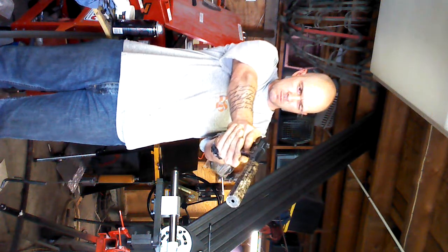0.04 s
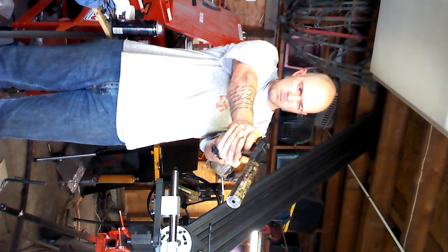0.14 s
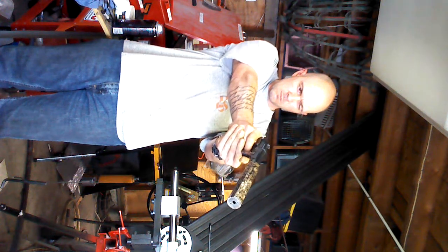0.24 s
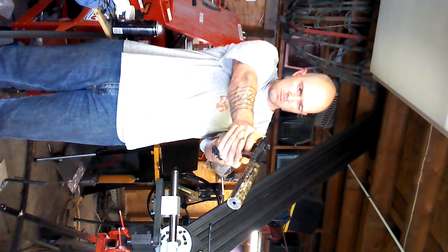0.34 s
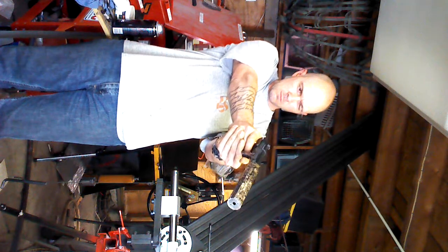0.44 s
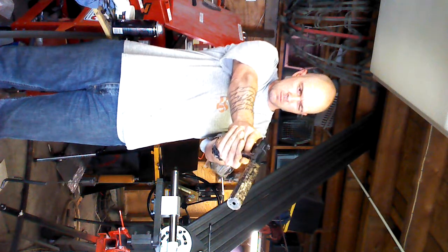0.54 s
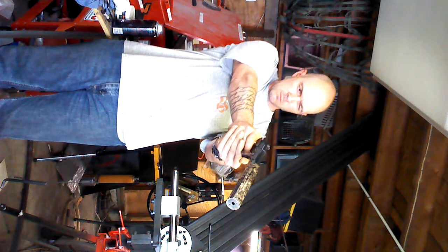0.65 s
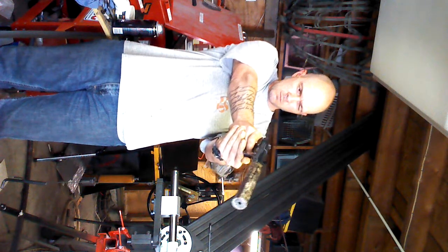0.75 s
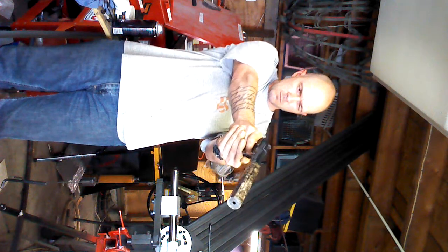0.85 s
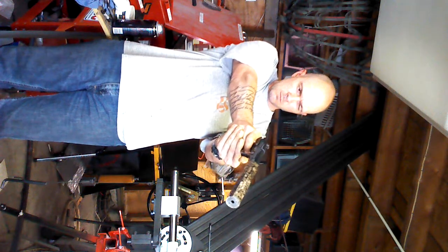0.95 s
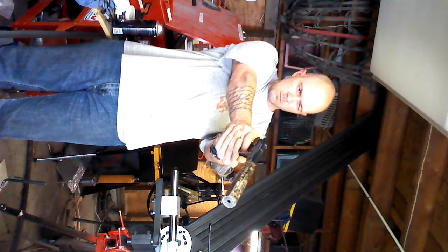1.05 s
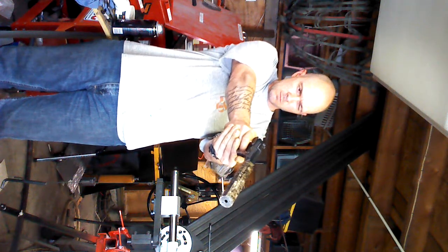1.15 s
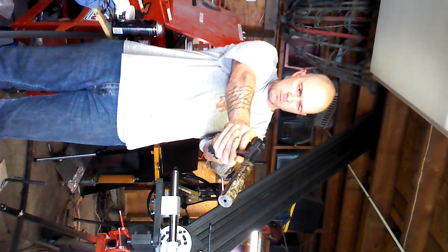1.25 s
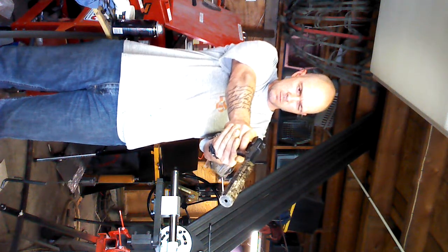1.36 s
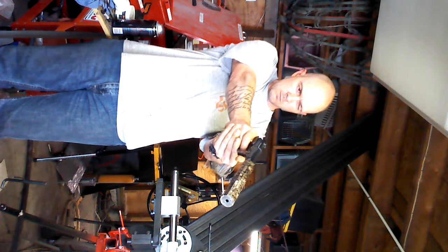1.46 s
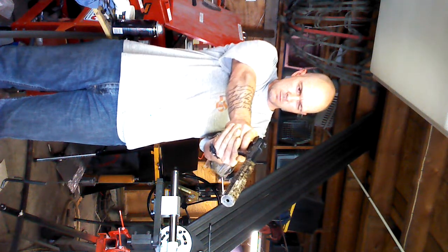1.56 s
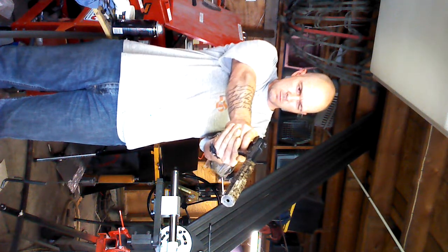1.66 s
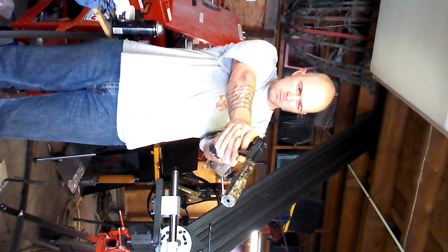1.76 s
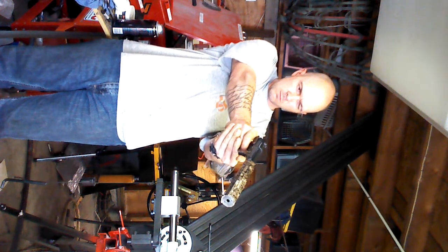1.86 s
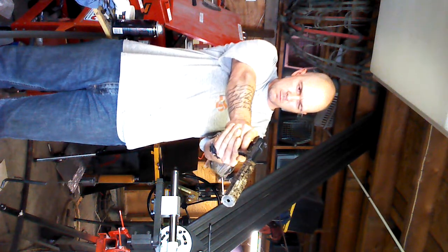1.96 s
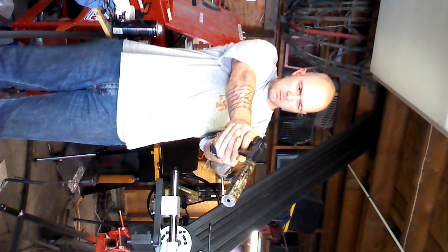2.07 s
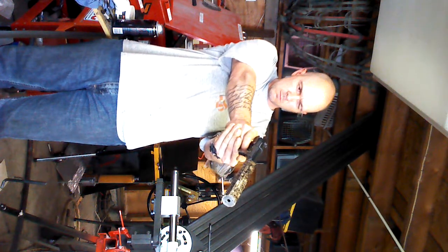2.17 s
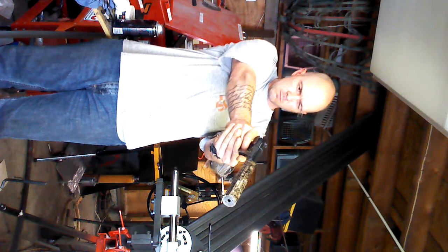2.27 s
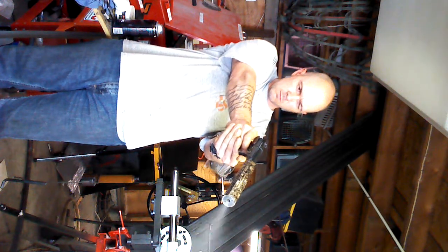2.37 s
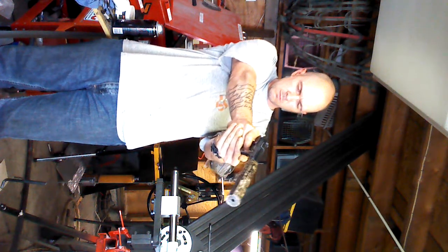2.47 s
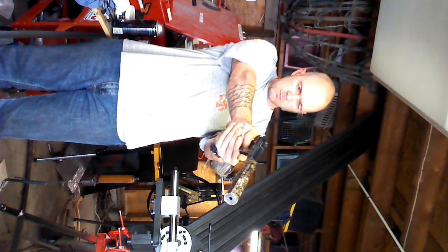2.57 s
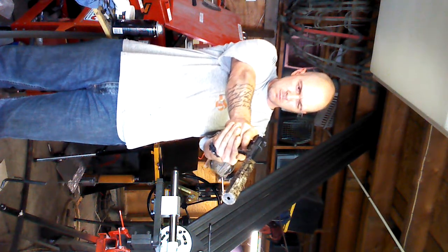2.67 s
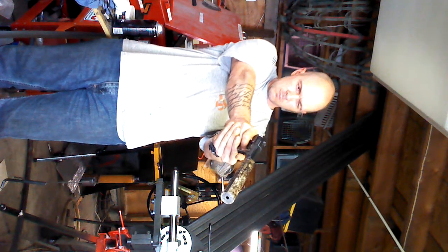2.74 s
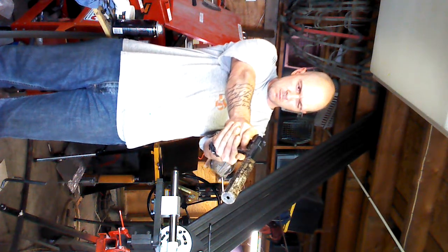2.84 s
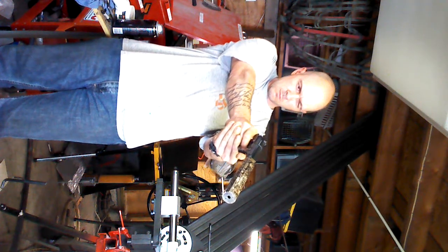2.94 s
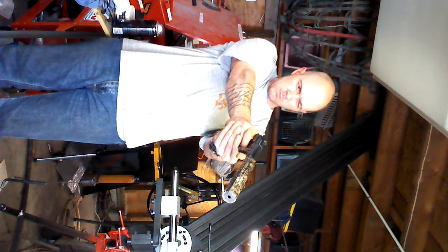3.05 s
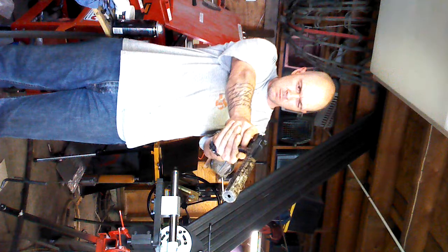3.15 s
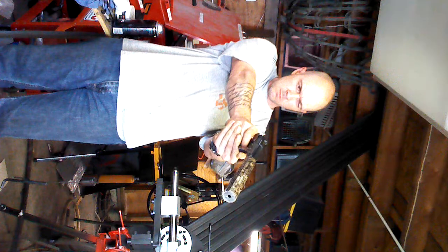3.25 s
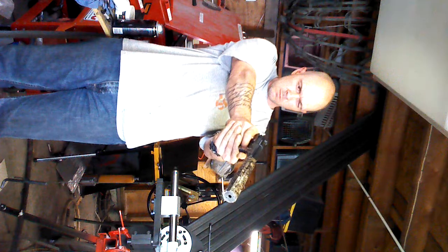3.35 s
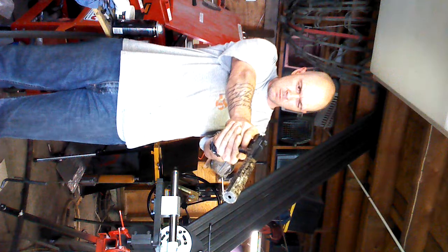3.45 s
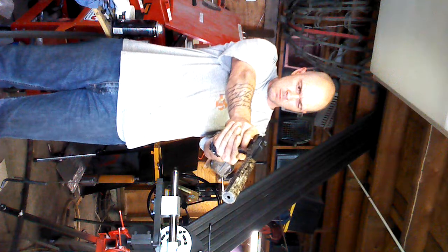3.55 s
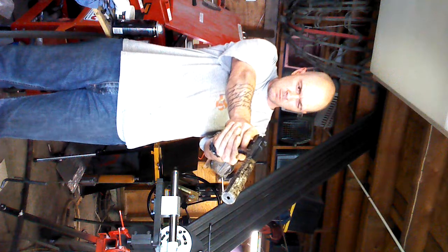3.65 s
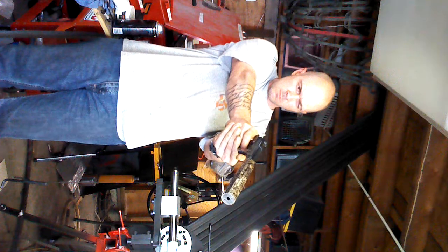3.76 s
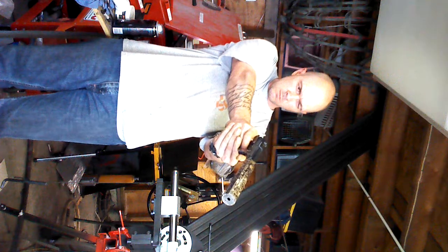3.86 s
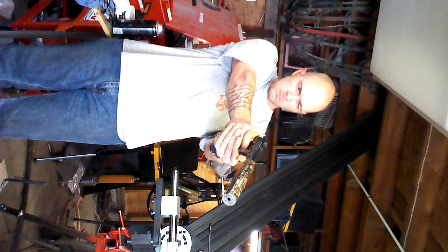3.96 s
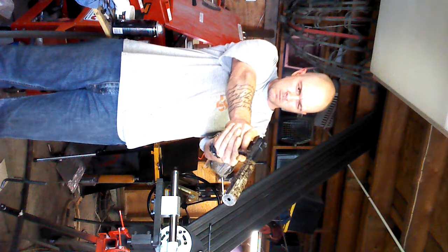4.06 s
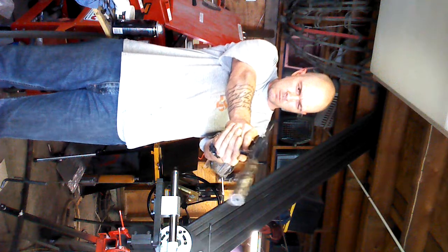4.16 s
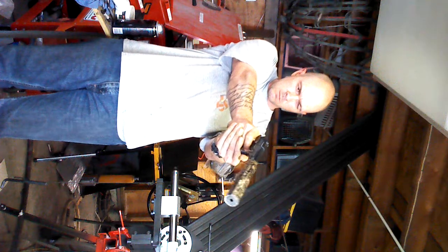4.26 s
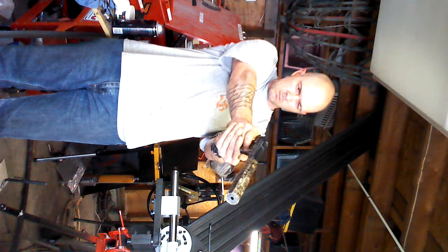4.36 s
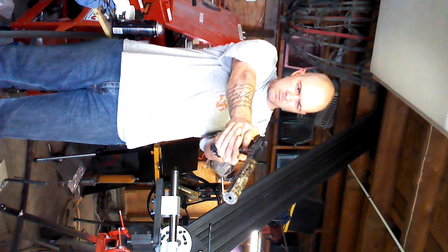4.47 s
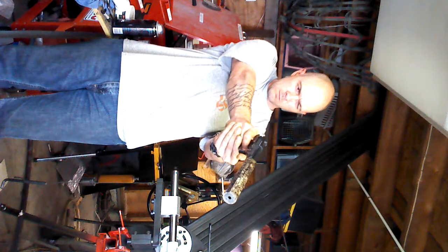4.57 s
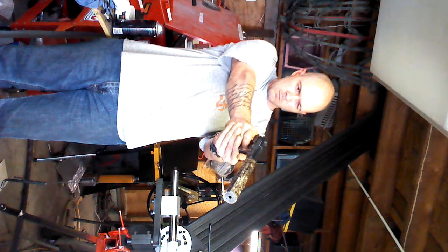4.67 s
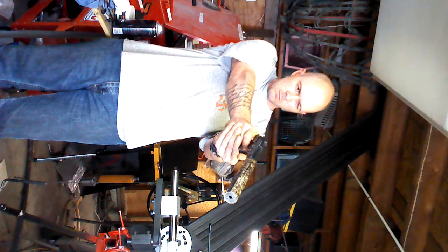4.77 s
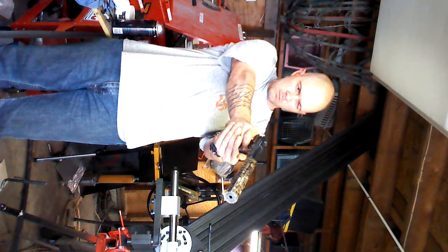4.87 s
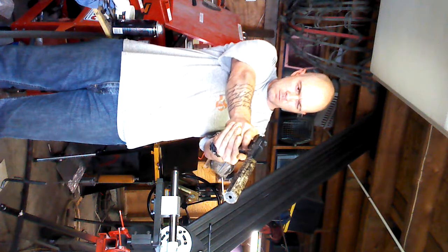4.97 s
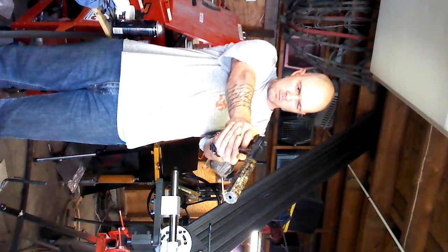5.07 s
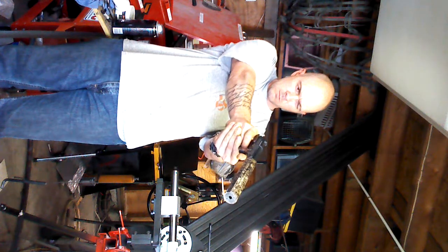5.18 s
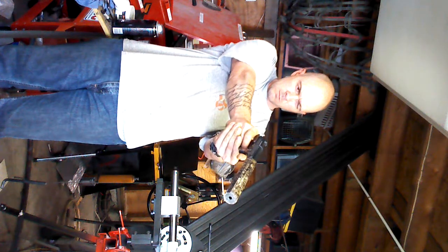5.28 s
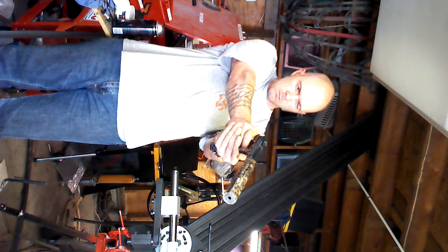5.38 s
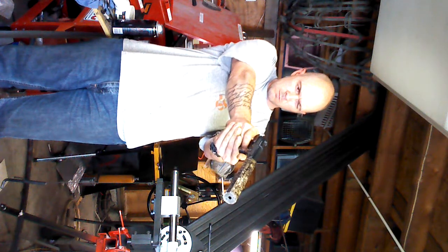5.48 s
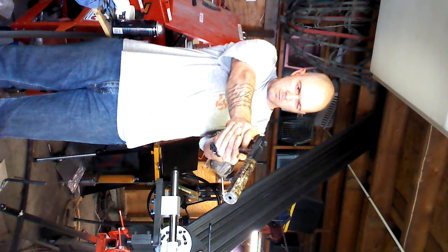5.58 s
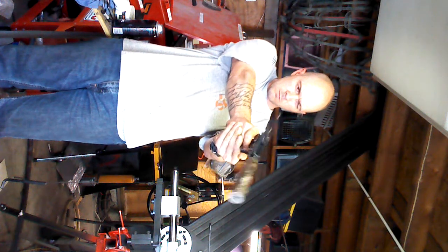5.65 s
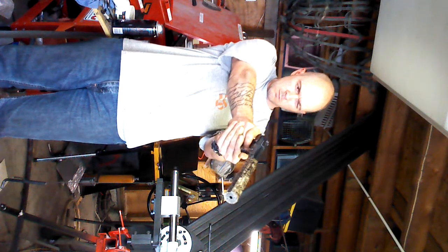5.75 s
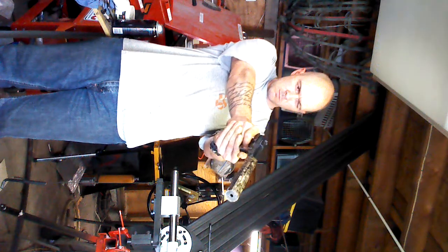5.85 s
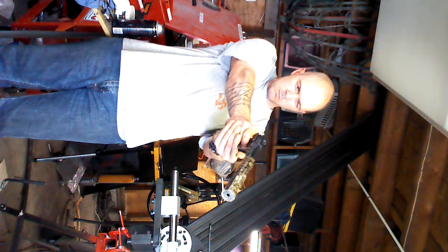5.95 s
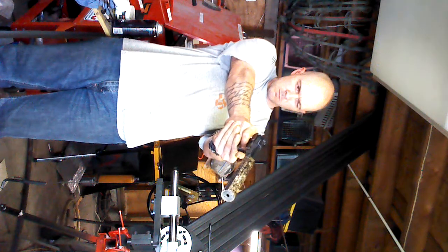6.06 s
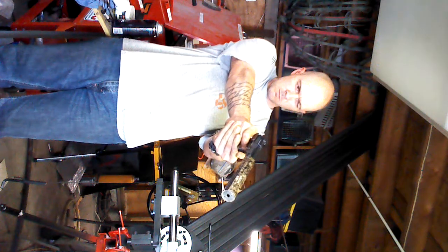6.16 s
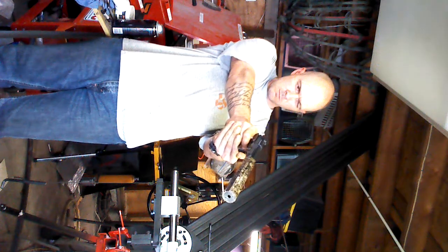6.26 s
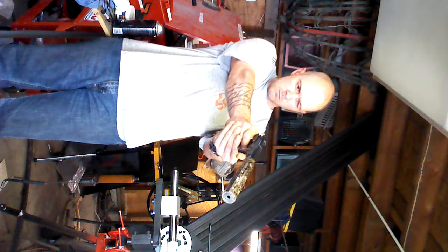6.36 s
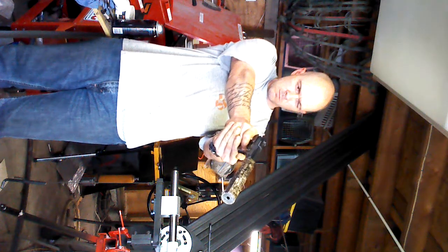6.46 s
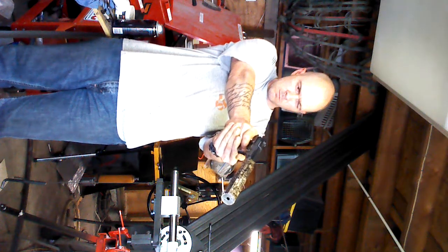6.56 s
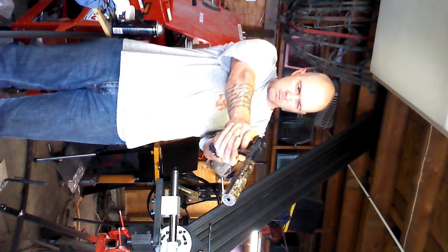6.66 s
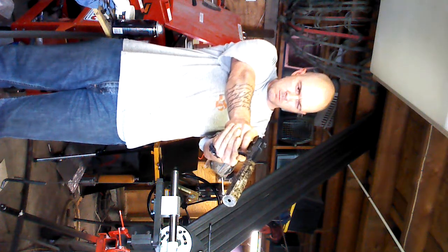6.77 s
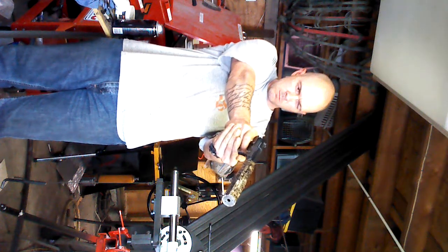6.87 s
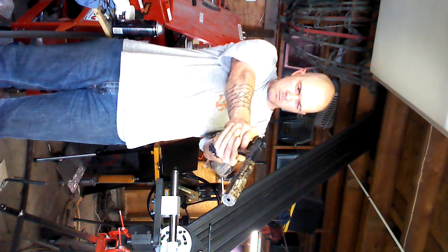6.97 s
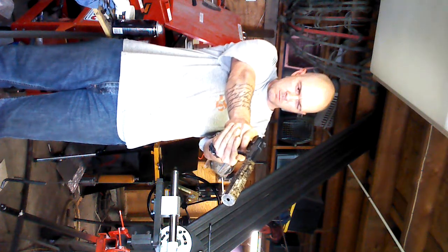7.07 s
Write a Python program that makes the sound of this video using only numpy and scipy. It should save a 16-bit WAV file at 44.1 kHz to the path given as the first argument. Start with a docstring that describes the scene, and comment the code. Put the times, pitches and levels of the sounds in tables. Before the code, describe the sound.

A quiet small-calibre pistol fires four spaced, snapping pops into wood, with slide rattle, trigger clicks and bouncing cases above a droning fan.

```python
"""A workshop with a droning fan, where a suppressed small-calibre pistol fires four times.
Shots sum a hammer, a muzzle pop ringing the suppressor's air, gas noise, a slide rattle and a strike on a
wooden block. Brass cases bounce on floor and benches, a steel tube rings and the trigger clicks: noise and modes.
The recorder cuts its gain on loud sound, lets it creep back, and subtracts from each microphone the other, delayed."""
import sys
import numpy as np
from scipy import signal
from scipy.fft import rfft, irfft, next_fast_len
from scipy.io import wavfile
from scipy.ndimage import uniform_filter1d

SR = 44100
rng = np.random.default_rng(int(sys.argv[2]) if len(sys.argv) > 2 else 0)


def transcribe(u):
    """Save the signal u as a 16-bit wav file named by the first command-line argument.

    u: samples, shape (n,) or (channels, n), limited to [-1, 1]; the rate is SR.
    q: integer samples, one column per channel.
    """
    v = np.clip(np.atleast_2d(u).T, -1, 1)
    q = np.round(v * 32767).astype(np.int16)
    wavfile.write(sys.argv[1], SR, q)


N = 313992


def amp(db):
    """Amplitude factor of a level in dB."""
    return 10 ** (np.asarray(db) / 20)


def unit(x):
    """Scale to rms 1."""
    return x / np.sqrt(np.mean(x ** 2) + 1e-20)


def along(points, hz):
    """Interpolate (Hz, value) points on a log frequency axis."""
    f, v = np.transpose(points)
    return np.interp(np.log(hz + 1), np.log(f + 1), v)


def filtered(x, response):
    """Multiply the spectrum of x by response(hz)."""
    size = next_fast_len(x.shape[-1] + 4096)
    spectrum = rfft(x, size) * response(np.fft.rfftfreq(size, 1 / SR))
    return irfft(spectrum, size)[..., :x.shape[-1]]


def add(track, start_s, sound):
    """Mix a two-microphone sound into track at start_s."""
    part = track[:, round(start_s * SR):][:, :sound.shape[1]]
    part += sound[:, :part.shape[1]]


# Likeness of diffuse noise at the two microphones. Each row: frequency in Hz, correlation from 0 to 1.
FAR_LIKENESS = [(300, 1), (520, 0.5), (700, 0.19), (1000, 0.026), (16000, 0.0072)]


def diffuse(colour, size, likeness=FAR_LIKENESS):
    """Noise of rms 1 from many directions: the microphones' correlation depends on frequency."""
    def shape(hz):
        angle = np.arccos(np.clip(along(likeness, hz), 0, 1)) / 2
        return amp(along(colour, hz)) * [np.cos(angle), np.sin(angle)]

    mid, side = filtered(rng.standard_normal((2, size)), shape)
    return unit(np.array([mid + side, mid - side]))


# Fan noise spectrum. Each row: frequency in Hz, relative level in dB.
FAN_NOISE = [(20, -24.5), (60, -26), (86, -6.5), (110, -2.5), (170, -6), (260, -5), (350, -2.5),
             (520, -6.5), (700, -10.5), (950, -17), (1300, -14), (1750, -20.5), (2400, -29), (3500, -34),
             (5000, -40.5), (8000, -49.5), (16000, -64)]
# Unsteady fan tones. Each row: frequency in Hz, half-width in Hz, level in dB.
FAN_TONES = [(206.1, 2.6, -50.5), (249, 23, -50.5), (324.8, 6, -52.5), (362, 15, -55.5), (457.2, 12, -52.5),
             (548, 11, -61)]


def fan():
    """Air noise, plus a steady tone and narrowband unsteady tones reaching both microphones alike."""
    out = amp(-45) * diffuse(FAN_NOISE, size=N)
    for tone_hz, width_hz, level_db in FAN_TONES:
        tone = filtered(rng.standard_normal(N), lambda hz: 1 / (1 + ((hz - tone_hz) / width_hz) ** 2))
        out = out + amp(level_db) * unit(tone)
    hum_hz, hum_db = 318.4, -45
    return out + amp(hum_db) * np.sin(2 * np.pi * hum_hz * np.arange(N) / SR)


# Likeness of nearby sharp sounds at the microphones. Each row: frequency in Hz, correlation from 0 to 1.
NEAR_LIKENESS = [(100, 0.54), (500, 0.75), (1200, 0.79), (2000, 0.033), (16000, .01)]


def burst(colour, t60_s, rise_s=.0003):
    """A puff of noise with exponential rise and decay."""
    t = np.arange(SR // 8) / SR
    return diffuse(colour, len(t), NEAR_LIKENESS) * amp(-60 * t / t60_s) * (1 - np.exp(-t / rise_s))


# Workshop reverberation. Each row: frequency in Hz, t60 in seconds before t60_scale.
ROOM_T60 = [(150, 0.18), (450, 0.46), (800, 0.32), (2000, 0.34), (4000, 0.34), (8000, 0.3), (12000, 0.23),
            (15500, 0.22)]


def echoes(colour, rise_s, t60_scale=0.96, uneven_db=2.47):
    """The workshop's answer to a sharp sound: frequencies die at their own speeds, in uneven reflections."""
    hz, t, bins = signal.stft(diffuse(colour, SR // 2, NEAR_LIKENESS), SR, nperseg=256)
    lumps = uniform_filter1d(rng.standard_normal(bins.shape[1:]), size=7, axis=0)
    lumps = unit(uniform_filter1d(lumps, size=2, axis=1))
    t60_s = t60_scale * along(ROOM_T60, hz)[:, None]
    gain_db = uneven_db * lumps - 60 * t / t60_s
    tail = signal.istft(bins * amp(gain_db), SR, nperseg=256)[1]
    return tail * (1 - np.exp(-np.arange(tail.shape[1]) / SR / rise_s))


def ring(modes, waver_hz=110):
    """Struck metal through reflections: each decaying mode wavers, differently at each microphone."""
    t = np.arange(SR // 3) / SR
    out = 0
    for mode_hz, level_db, t60_s in modes:
        line = filtered(rng.standard_normal((2, len(t))), lambda hz: np.exp(-((hz - mode_hz) / waver_hz) ** 2))
        out = out + amp(level_db - 60 * t / t60_s) * unit(line)
    return out * (1 - np.exp(-t / 0.0014))


# Knock spectrum of struck wood. Each row: frequency in Hz, relative level in dB.
WOOD_KNOCK = [(250, -43.5), (700, -11), (1400, 1.5), (2200, 0.5), (3500, -33), (7000, -72)]


def tick(out, start_s, level_db, knock_db, treble_db, direct_db, top_db, t60_s):
    """A small hard contact: direct noise burst, wooden knock and room echoes."""
    colour = [(450, knock_db - 18.0), (1500, knock_db + 8.5), (5000, 0.00057),
              (10500, treble_db + 2.5), (14500, treble_db + top_db), (16000, treble_db - 14.5)]
    add(out, start_s, amp(level_db + direct_db) * burst(colour, t60_s, rise_s=0.00023))
    add(out, start_s, amp(level_db + knock_db + 1.5) * burst(WOOD_KNOCK, t60_s=0.04))
    add(out, start_s, amp(level_db) * echoes(colour, rise_s=0.0039, t60_scale=0.94))


# Case bounces. Each row: start in seconds, level in dB, surface hardness from 0 wood to 1 concrete,
# brass ring in dB relative to the level.
CASE_BOUNCES = [(.0782, -46.5, 0.1, -46), (0.6855, -49.5, 0.0, -46), (1.3127, -35.5, 0.42, -37),
                (1.3329, -38.5, 0.69, -16), (1.474, -40, 0.78, -35), (1.5996, -61, .4, 1),
                (1.655, -49, 0.11, -31), (1.7505, -51.5, 0.28, -41), (3.0589, -46.5, 0.52, -28),
                (3.1523, -52, 0, -16), (4.8339, -36, 0.23, -45), (4.9896, -47, .35, -7),
                (5.0671, -44, 0.55, -27), (5.2744, -62.5, .95, 2), (5.3994, -72.5, .8, -15),
                (5.4844, -68.5, 1, -6), (5.5898, -72.5, .45, -3.5), (6.299, -48, 0.7, -20),
                (6.3072, -35, 0.086, -30), (6.3096, -44.5, 0.71, -5), (6.4209, -36.5, 0.46, -40.5),
                (6.6541, -64.5, 0.42, -10.5), (6.6744, -67, 0.6, 0), (7.1003, -45, 0.62, -32.5)]
# Ring modes of a brass case. Each row: share of the case's pitch, level in dB, t60 in seconds.
BRASS_MODES = [(.478, -6, .2), (1.002, -1, .2)]
# Pitch of each shot's case in Hz, one entry a shot.
CASE_PITCH_HZ = [12370, 12300, 12500, 12730]


def case_bounces():
    """Brass cases tick on floor and benches and ring; hardness blends the wood and concrete colours."""
    # low knock dB, treble dB, direct sound dB
    on_wood, on_concrete = np.array((6.3, -36.5, 7)), np.array((-15.5, -3, 7.8))
    out = np.zeros((2, N))
    for start_s, level_db, hard, ring_db in CASE_BOUNCES:
        knock_db, treble_db, direct_db = (1 - hard) * on_wood + hard * on_concrete
        tick(out, start_s, level_db, knock_db, treble_db, direct_db, top_db=-14.5, t60_s=.028)
        shots_so_far = sum(shot[0] < start_s for shot in SHOT_EVENTS)
        pitch_hz = CASE_PITCH_HZ[max(shots_so_far - 1, 0)]  # before any shot: first pitch
        modes = [(pitch_hz * share, mode_db, t60_s) for share, mode_db, t60_s in BRASS_MODES]
        add(out, start_s, amp(level_db + ring_db) * ring(modes))
    return out


# Trigger clicks. Each row: start in seconds, level in dB.
CLICKS = [(0.138, -45), (1.0457, -44.5), (3.0076, -45), (3.1793, -38.5), (5.101, -45.5), (6.719, -42)]


def trigger_clicks():
    """The trigger's mechanism makes short, bright contacts."""
    out = np.zeros((2, N))
    for start_s, level_db in CLICKS:
        tick(out, start_s, level_db, knock_db=-8.5, treble_db=-7.5, direct_db=8.6, top_db=9.0, t60_s=0.0075)
    return out


# Crash spectrum, shared by hammer and block strike. Each row: frequency in Hz, relative level in dB.
CRASH_COLOUR = [(100, -20.5), (300, -11), (700, -20.5), (1300, -4), (2100, 0), (3800, -5), (5000, -8.5),
                (7500, -13.5), (9500, -15), (12500, -15), (15500, -24.5)]


def hammer():
    """The falling hammer: a short noise burst."""
    return amp(-21.5) * burst(CRASH_COLOUR, t60_s=0.022, rise_s=0.0022)


def push(width_s):
    """A suction pulse and its rebound."""
    u = np.arange(SR // 50) / SR / width_s
    return -np.e * u * (1 - u / 2) * np.exp(-u)


# Air modes in the suppressor. Each row: frequency in Hz, mean level in dB, t60 in seconds.
SUPPRESSOR_MODES = [(268, -17, 0.0092), (1030, 5.5, 0.003), (3950, 0.5, 0.0037), (6430, -11.5, 0.001)]


def suppressor_air():
    """The gas front rings the air inside the suppressor as decaying sines."""
    t = np.arange(SR // 20) / SR
    out = 0
    for mode_hz, level_db, t60_s in SUPPRESSOR_MODES:
        spread_db = rng.normal(0, 0.67, (2, 1))
        out = out - amp(level_db + spread_db - 60 * t / t60_s) * np.sin(2 * np.pi * mode_hz * t)
    return out


# Gas noise spectrum. Each row: frequency in Hz, relative level in dB.
GAS_COLOUR = [(100, -18.5), (400, 0.5), (1000, -5), (4000, -0.5), (7000, -4.5), (12000, -13), (16000, -7.5)]


def muzzle(out, start_s):
    """Pop, ringing suppressor air and escaping gas; the blast also shoves the nearer, second microphone."""
    pop_db, gas_db, shove_db = 3.5, -11.5, -5.5
    add(out, start_s, amp(pop_db) * push(.00005) * [[1], [1]])
    add(out, start_s, amp(pop_db - 10.0) * suppressor_air())
    add(out, start_s, amp(pop_db - 5.5) * burst(GAS_COLOUR, t60_s=.006))
    add(out, start_s + 0.00012, amp(shove_db) * push(0.00049) * [[0], [1]])
    add(out, start_s, amp(gas_db) * echoes(GAS_COLOUR, rise_s=0.0045, t60_scale=0.99))


# Slide rattle spectrum. Each row: frequency in Hz, relative level in dB.
RATTLE_COLOUR = [(5000, -28.5), (9000, 6.5), (10500, -1), (12500, 0), (15000, -13)]


def slide(level_db):
    """The slide's metal rattle: treble noise with room decay."""
    return amp(level_db) * echoes(RATTLE_COLOUR, rise_s=0.00088, t60_scale=0.98)


def block_strike(out, start_s, thud_db, crash_db):
    """The bullet thuds into the block by the first microphone; its crash fills the room."""
    add(out, start_s, amp(thud_db) * push(0.00041) * amp([[0], [-25]]))
    add(out, start_s, amp(crash_db) * echoes(CRASH_COLOUR, rise_s=0.0014, uneven_db=1.33))


# Shots. Each row: start in seconds, slide rattle in dB, block thud in dB, strike crash in dB.
SHOT_EVENTS = [(0.73, -18.5, -4, -3.5), (2.431, -17.5, 13.5, -2.5), (4.2188, -18, -1, -3),
               (5.7057, -23.5, -9, -2.5)]


def shots():
    """Each shot in order: hammer, muzzle, slide, block strike."""
    out = np.zeros((2, N))
    for start_s, rattle_db, thud_db, crash_db in SHOT_EVENTS:
        add(out, start_s - .0028, hammer())
        muzzle(out, start_s)
        add(out, start_s + .0105, slide(rattle_db))
        block_strike(out, start_s + .0167, thud_db, crash_db)
    return out


# Steel tube modes. Each row: frequency in Hz, level in dB, t60 in seconds.
TUBE_MODES = [(1985, 0, .25), (4440, 4, 0.17), (6830, -9, 0.22), (8980, -18, 0.28)]
# Blows on the tube. Each row: start in seconds, level in dB.
TUBE_BLOWS = [(1.3135, -43), (1.4744, -42)]


def tube_hits():
    """A steel tube met by some bounces rings in its modes."""
    out = np.zeros((2, N))
    for start_s, level_db in TUBE_BLOWS:
        add(out, start_s, amp(level_db) * ring(TUBE_MODES, waver_hz=40.3))
    return out


# Second microphone's response. Each row: frequency in Hz, gain in dB.
SECOND_MIC = [(100, 4.5), (500, 2), (1500, 2), (2400, -1), (3500, 4), (6000, -1), (12000, 3)]


def scene():
    """Sum the sources at two microphones; colour the second."""
    first, second = fan() + case_bounces() + trigger_clicks() + shots() + tube_hits()
    return np.array([first, filtered(second, lambda hz: amp(along(SECOND_MIC, hz)))])


def gain_control(x, knee_db=-25, slope=0.79, release_db_per_s=9, start_db=11, attack_s=0.0044):
    """Loud sound cuts the gain quickly; it creeps back at a constant rate, from a cut of start_db or more."""
    released_db = release_db_per_s * np.arange(N) / SR
    power = uniform_filter1d(np.mean(x ** 2, 0), size=441, origin=220)  # trailing 10 ms
    cut_db = np.maximum(slope * (10 * np.log10(abs(power) + 1e-12) - knee_db), 0)
    held_db = np.maximum.accumulate(cut_db + released_db)
    cut_db = np.maximum(held_db, start_db) - released_db
    keep = np.exp(-1 / (attack_s * SR))
    smooth_db = signal.lfilter([1 - keep], [1, -keep], cut_db - cut_db[0]) + cut_db[0]
    return x * amp(-smooth_db)


# Circuit hiss spectrum. Each row: frequency in Hz, relative level in dB.
CIRCUIT_HISS = [(2000, -9), (8000, -2), (14500, -1.5), (15400, -6.5), (15800, -29.5)]


def record(dry):
    """Bass cut, gain control, circuit hiss, crossed subtraction for width, overload and band limit."""
    cross_delay_samples, top_hz = 16, 16600
    mics = filtered(dry, lambda hz: (1j * hz / (70 + 1j * hz)) ** 2 + amp(-30.0))
    mics = gain_control(mics) + amp(-86.0) * diffuse(CIRCUIT_HISS, size=N)
    crossed = np.pad(mics[::-1], ((0, 0), (cross_delay_samples, 0)))[:, :N]
    wide = mics - crossed
    wide = wide / (1 + abs(wide / .9) ** 6) ** (1 / 6)  # soft overload towards 0.9

    def band_limit(hz):
        step_db = -7 * (1 + np.tanh((hz - 15750) / 110))
        slope_db = -45 * np.clip((hz - 15900) / 700, 0, 1) ** 3
        return amp(step_db + slope_db) * (hz < top_hz)

    return filtered(wide, band_limit)


dry = scene()
out = record(dry)
transcribe(out)
```